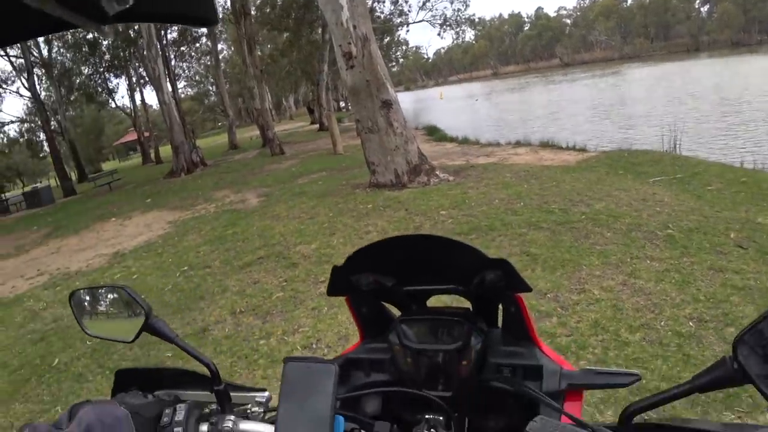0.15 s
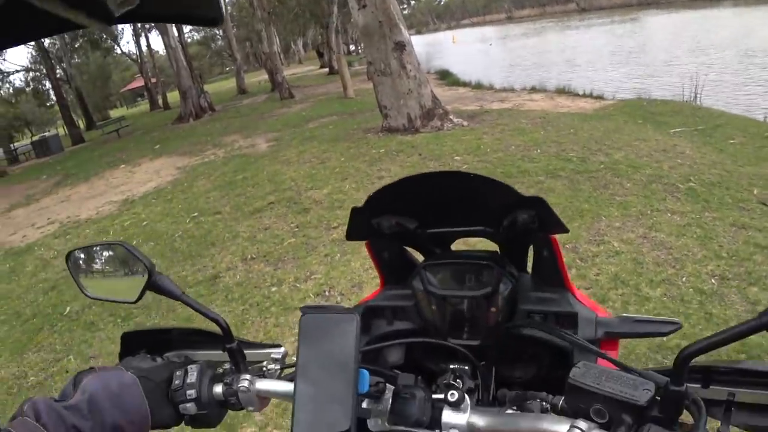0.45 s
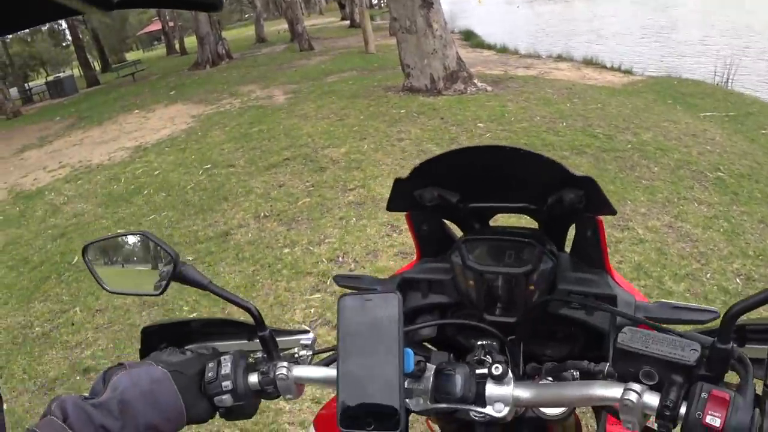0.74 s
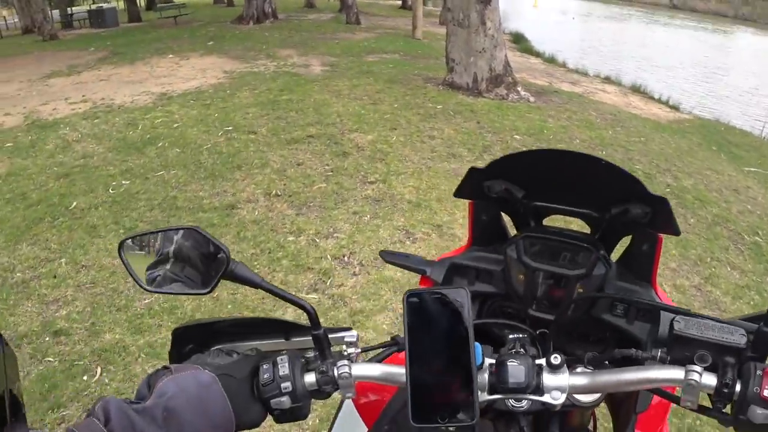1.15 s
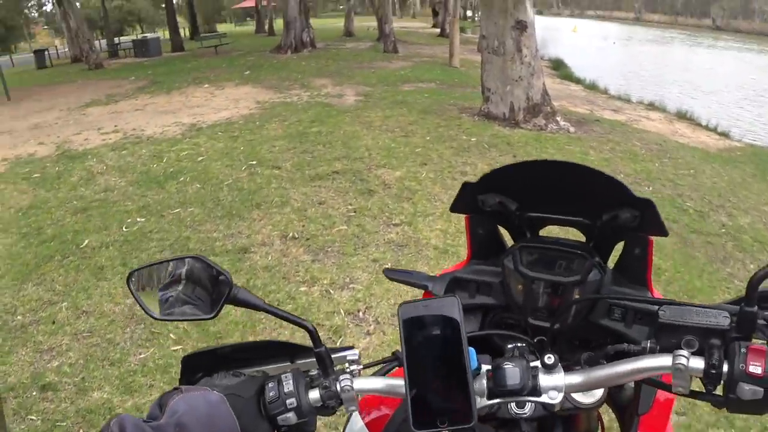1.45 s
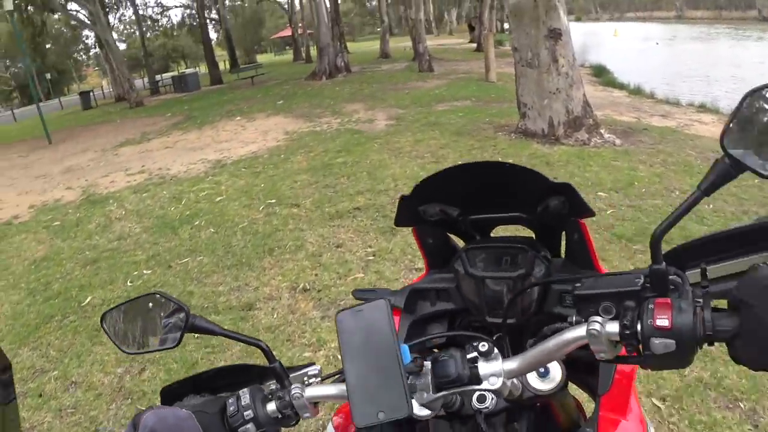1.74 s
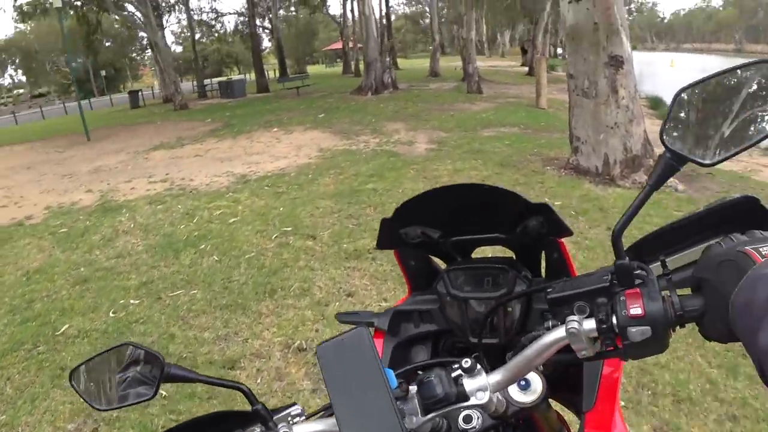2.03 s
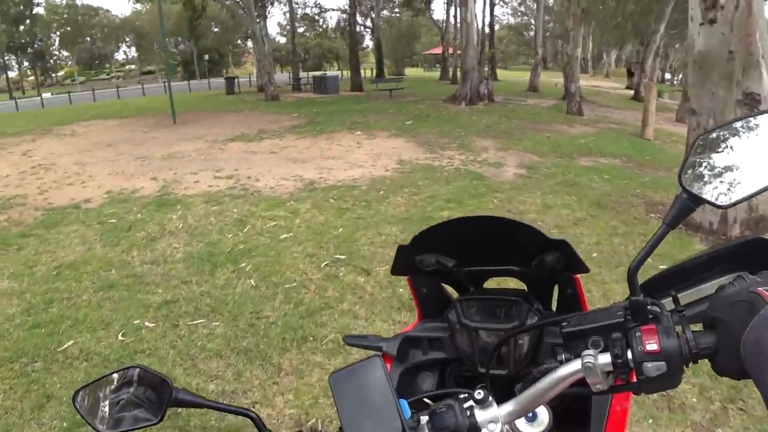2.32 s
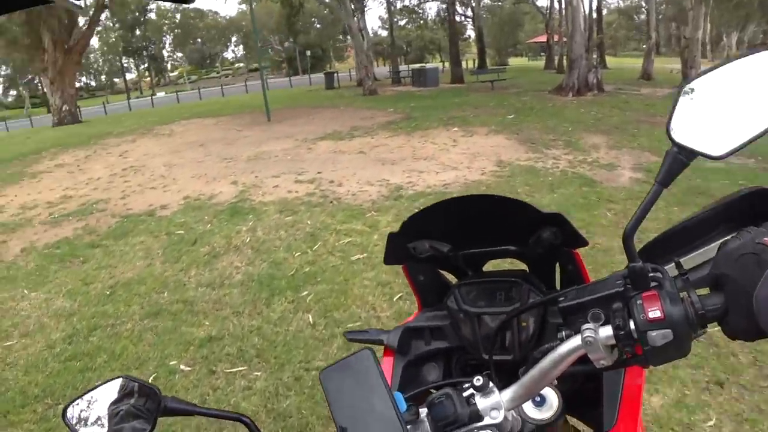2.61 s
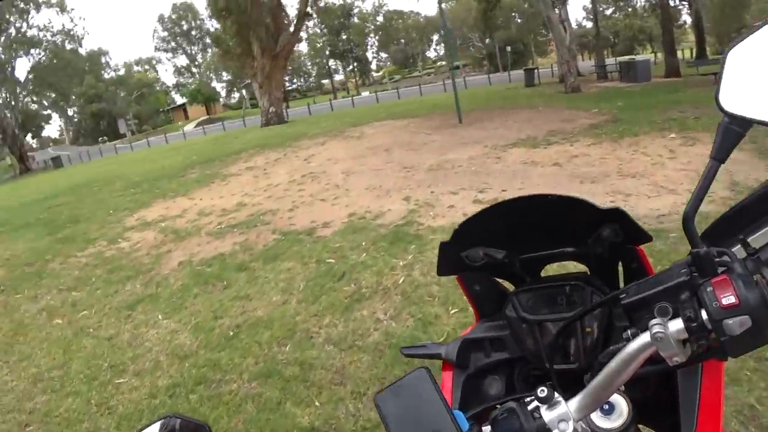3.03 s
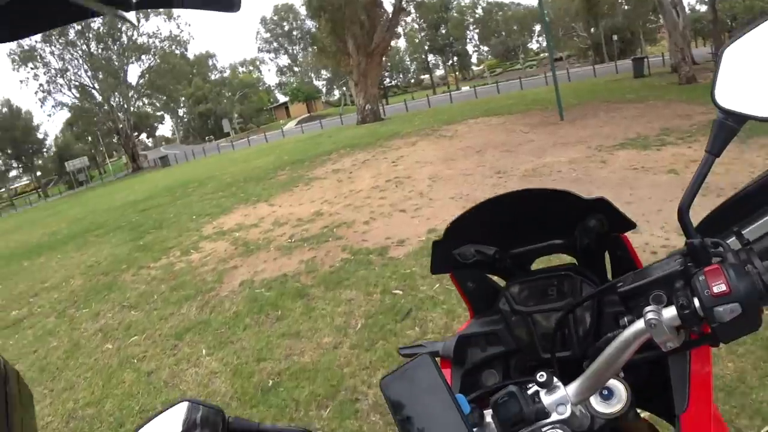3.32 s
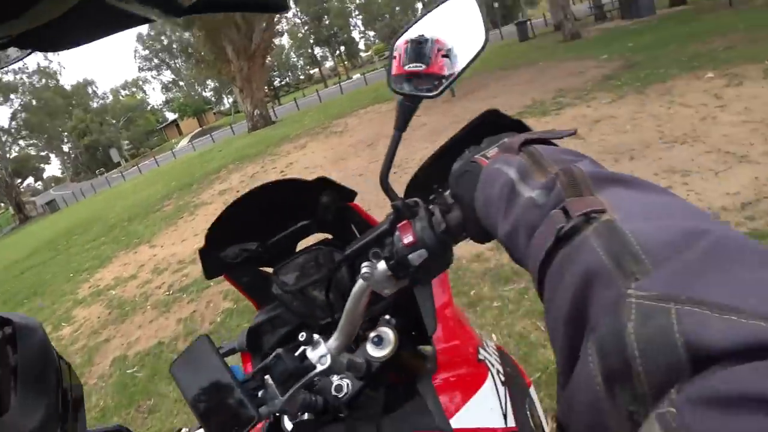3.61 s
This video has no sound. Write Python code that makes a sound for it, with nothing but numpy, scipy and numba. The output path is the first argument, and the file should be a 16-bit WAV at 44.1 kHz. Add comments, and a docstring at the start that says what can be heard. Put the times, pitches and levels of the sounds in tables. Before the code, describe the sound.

A twin-cylinder motorcycle engine idles with lumpy, uneven thumps, dips near 0.55 s with a soft intake gasp, then revs up by 1 s and holds until 1.8 s. It falls to 2.15 s, blips highest at 2.4 s, sags by 2.8 s, and recovers to steady moderate revs. Valve ticks, casing whirr and wobbling gear whine follow; small metal chinks near 2.9 s; low air rumble, close and dry.

```python
"""A parallel-twin motorcycle engine idles, then revs up and down in uneven swells.
Two unevenly spaced firings a cycle ring the pipes as decaying pressure steps; gas rasps and silencer tones join.
Filtered noise makes the valve ticks, casing whirr and intake; a wobbling tone makes the gear whine.
A small metal part jingles briefly over low air rumble; a limiter ducks everything after each thump."""
import sys
import numpy as np
from scipy import signal
from scipy.fft import rfft, irfft
from scipy.io import wavfile
from scipy.ndimage import uniform_filter1d, minimum_filter1d, map_coordinates
from numba import njit

SR = 44100
rng = np.random.default_rng(int(sys.argv[2]) if len(sys.argv) > 2 else 0)


def unload_wav(signal):
    """Save mono or channel-first audio to the path in sys.argv[1] as 16-bit WAV at rate SR, clipped to [-1, 1]."""
    wavfile.write(
        sys.argv[1],
        SR,
        np.round(np.clip(np.atleast_2d(signal).T, -1, 1) * 32767).astype(np.int16),
    )


N = 165375

# A cycle is one four-stroke cycle; a turn is crank position in cycles.
# Engine speed. Each row: time in seconds, rate in cycles per second.
SPEED = [(0.0, 9.49), (0.35, 9.78), (0.55, 7.96), (0.65, 9.18), (0.8, 13.65), (0.97, 16.87), (1.15, 17.38),
         (1.5, 17.77), (1.8, 17.71), (1.9, 16.44), (2.05, 12.72), (2.15, 11.34), (2.3, 16.48),
         (2.41, 20.39), (2.55, 16.54), (2.7, 11.83), (2.81, 9.19), (2.9, 11.97), (3.05, 14.23),
         (3.2, 15.12), (3.5, 15.09), (3.75, 14.82)]
START_TURN, IDLE_CYCLES_PER_S, CRUISE_CYCLES_PER_S = -.43, 9.5, 15.16
# Engine effort. Each row: time in seconds, then levels in dB of firing, bark, growl, mechanical noise
# and off-throttle boom.
EFFORT = [(0, 6.5, 1.5, -5, 3.5, -5), (.45, 2, -0.5, 4.5, 0.5, -10), (.58, 2, -1.5, -9, 0, -10),
          (.78, 11.5, 0.5, -4, 7.5, -25), (1.05, 8.5, -0.5, 4, 3.5, -19), (1.4, 6.5, 0, 4.5, 2.5, -12),
          (1.8, 5, 0.5, 5, -0.5, -9), (2.0, -4, 0, -8, -1, 2.5), (2.11, 0, 1.5, -8, 0, -1.5),
          (2.27, 3.5, 0, 7, -1, -19), (2.42, 8, 2, -14, 3.5, -6), (2.5, -6, 5.5, -8, -2.5, 3.5),
          (2.6, -3, 2, 6.5, -3, -3), (2.68, -3, 3, 4, -2, -2), (2.8, -6.5, 0.5, 12.5, -2.5, -1.5),
          (2.95, 3.5, 2, -10, 1.5, -6.5), (3.15, 2.5, 1, -11, 1.5, -5), (3.75, 0.5, 0.5, -20, 1, -19)]

# The two firings. Each row: crank position in cycles, level in dB, relaxation at cruise in seconds.
FIRINGS = [(0, 0, .00195), (.371, 2.4, .00096)]
PULSE_DB, FIRING_SCATTER_DB, DIRECT_DB = 3, 2.37, -13.5
EDGE_S, SWELL_S, SWELL_SHARE = .0019, .0017, .36
STRETCH_POWER = 1.82  # a slower crank draws each pulse out
SURGE_DB, SURGE_TURN, SURGE_WIDTH_CYCLES = -22.5, .70, .12
# Low resonances of pipe and airbox. Each row: centre in Hz, width in Hz, level in dB.
PIPE_MODES = [(60.76, 1.7, 8), (75.1, 13.7, 5.5), (95.3, 23.5, 6), (116.2, 16.3, 4.5), (129.9, 12, 4.1)]
# Upper resonances, the bark. Each row: centre in Hz, width in Hz, level in dB.
BARK_MODES = [(216.7, 6.5, 2.5), (240.6, 38, 4.5), (291.4, 30, -3.1), (320.7, 8.8, -8)]
# Highest resonances, the growl. Each row: centre in Hz, width in Hz, level in dB.
GROWL_MODES = [(372.5, 11, 1), (419, 6.5, 5), (475.4, 4.4, 4.5)]
PUFF_DB, PUFF_DECAY_S = -39, .0062
# Clean silencer tones. Each row: multiple of the cycle rate, level in dB.
SILENCER_TONES = [(18, -43), (19, -43), (22, -51), (24, -45.5), (27, -48)]

# Spectrum of the engine's mechanical noise. Each row: frequency in Hz, relative density in dB per Hz.
CASING_SPECTRUM = [(290, 7.5), (450, 2), (540, -3), (764, -8), (847, -16), (1050, -5), (1360, -4.5),
                   (1670, -8.5), (2110, -15.5), (2910, -18.5), (3350, -26.5), (3620, -29.5), (4450, -24),
                   (5750, -28), (7160, -34.5), (10100, -40), (10800, -49.5), (14000, -94), (22000, -120)]
WHIRR_DB, TICK_DB, TICK_DECAY_S, TICK_SCATTER_DB = -34, -35, .0021, 6
CASING_RING_S, CASING_RING_DB = .01, -2
SING_HZ, SING_WIDTH_HZ, SING_DB = 5986, 193, 10

# Hiss and hum levels are relative to the air rasp.
GULP_DB, GULP_FADE_DB_PER_RATE = -37.5, -2.91  # fade per cycle/s over idle
RASP_HZ, RASP_BAND_HZ, RASP_TURN, RASP_WIDTH_CYCLES = 1300, 1230, .92, .031
HISS_DB, HISS_TURN, HISS_WIDTH_CYCLES = -15.5, .91, .037
HUM_HZ, HUM_DB, HUM_TURN, HUM_WIDTH_CYCLES = 216.9, 14, .65, .23

# Gear whine, sliding against the engine as the clutch slips. Each row: time in seconds, pitch in Hz, level in dB.
WHINE = [(0, 897.3, -3), (0.62, 946, -13), (0.721, 1104, 6.5), (0.818, 1250, 5), (1.001, 1570, -1),
         (1.201, 1641, -3), (1.78, 1688, -4), (1.9, 1467, -2.5), (1.999, 1230, -1.5), (2.117, 1101, 5),
         (2.201, 1140, -7.5), (2.321, 1650, -6), (2.431, 1897, -5), (2.55, 1397, -10), (2.652, 1140, 0.5),
         (2.702, 1090, 1.5), (2.758, 950, -1), (2.82, 930, -3.5), (2.881, 1145, -4.5), (3.003, 1130, 1.5),
         (3.103, 1295, -0.5), (3.4, 1370, -3), (3.75, 1420, 2)]
# Load peaks on the gear teeth. Each row: crank position in cycles, level in dB over the steady whine.
TOOTH_LOADS = [(.23, 4), (.55, 0), (.74, 4), (.92, 5)]
# Resonances of the clutch cover. Each row: centre in Hz, width in Hz, level in dB.
COVER_MODES = [(1126, 103, 4), (1700, 160, -5), (1900, 180, -1)]
WHINE_DB, OVERTONE_DB, LOAD_WIDTH_S = -40.5, -11, .0021
WHINE_SWING_HZ, WHINE_ROUGHNESS = 28, .4
CRUISE_JITTER_HZ, JITTER_POWER = 35, 1.5  # jitter grows as this power of engine speed

# Resonances of the opened intake, passed twice. Each row: centre in Hz, width in Hz, level in dB a pass.
INTAKE_MODES = [(423, 46, 1), (525, 100, -2.5), (1140, 230, -3.5)]
GASP_AT_S, GASP_WIDTH_S, GASP_DB = .567, .012, -28

# Metal chinks. Each row: start in seconds, shiver level in dB, attack in seconds, decay in seconds, knock level in dB.
CHINKS = [(2.843, -40.5, 0.00035, 0.0026, -34), (2.878, -40, 0.00056, 0.003, -34.5),
          (2.913, -50, 0.0041, 0.018, -51), (2.932, -37, 0.013, 0.041, -43)]
# Rings of the metal part. Each row: centre in Hz, first-pass width in Hz, level in dB.
METAL_MODES = [(5860, 310, -6), (7990, 490, -1.5), (8930, 180, -9), (9100, 580, -1), (10330, 270, -1)]
RING_DB, RING_DECAY_S = -7.5, .034

BOOM_DB, BOOM_HZ, BOOM_WIDTH_HZ, BOOM_WANDER = -16.5, 53, 16.6, .74
AIR_DB, BODY_DB = -29, -36
CEILING, RELEASE_S, LOOK_SPAN_S, TOP_HZ = .52, .039, .00061, 10800


def undb(db):
    """Amplitude ratio of a level in dB."""
    return 10 ** (np.asarray(db) / 20)


def unit(x):
    """Scale to an RMS of 1."""
    return x / np.sqrt(np.mean(x ** 2))


def noise():
    """White noise of the scene's length."""
    return rng.standard_normal(N)


def band(x, hz, width_hz):
    """Resonance with gain 1 at its centre."""
    b, a = signal.iirpeak(min(hz, .45 * SR), hz / width_hz, fs=SR)
    return signal.lfilter(b, a, x)


def ring(x, modes):
    """Sum of parallel resonances, each (Hz, width Hz, dB)."""
    return sum(undb(db) * band(x, hz, width_hz) for hz, width_hz, db in modes)


def colour(x, points):
    """Shape a spectrum by (Hz, dB) points, falling steeply below the first."""
    hz, db = np.array(points).T
    f = np.maximum(np.fft.rfftfreq(N, 1 / SR), 1)
    low_cut = np.minimum(f / hz[0], 1) ** 2
    gain = undb(np.interp(np.log(f), np.log(hz), db)) * low_cut
    return irfft(rfft(x) * unit(gain), N)


def walk(points_per_s):
    """Smooth random wander with RMS 1."""
    points = rng.standard_normal(8192)
    position = np.arange(N) / SR * points_per_s
    return unit(map_coordinates(points, [position], order=3, mode="wrap"))


def since(turn, offset):
    """Signed seconds from the nearest passing of a crank position, and that passing's index."""
    t = np.arange(N) / SR
    number = np.round(turn - offset)
    passing_s = np.interp(number + offset, turn, t, left=-1, right=t[-1] + 1)
    return t - passing_s, number.astype(int) + 2


def exhaust(turn, rate, bark_db, growl_db):
    """Each firing, a swell and a sharp pressure drop, rings the pipes; a soft low surge follows the second firing."""
    push = 0
    stretch = (CRUISE_CYCLES_PER_S / rate) ** STRETCH_POWER
    for offset, db, relax_s in FIRINGS:
        age_s, number = since(turn, offset)
        swell = SWELL_SHARE * np.exp(-abs(age_s) / SWELL_S)
        relaxation = np.exp(-abs(age_s) / (relax_s * stretch))
        shape = np.where(age_s < 0, swell, relaxation)
        level_db = db + FIRING_SCATTER_DB * rng.standard_normal(128)[number]
        push = push - np.tanh(age_s / EDGE_S) * shape * undb(level_db)
    surge_age = since(turn, SURGE_TURN)[0] * rate / SURGE_WIDTH_CYCLES
    surge = undb(SURGE_DB) * (1 - 2 * surge_age ** 2) * np.exp(-surge_age ** 2)
    bark = undb(bark_db) * ring(push, BARK_MODES)
    growl = undb(growl_db) * ring(push, GROWL_MODES)
    return undb(DIRECT_DB) * push + ring(push, PIPE_MODES) + bark + growl + surge


def puffs(turn):
    """Gas rasps at each firing: band noise that swells and fades about it."""
    gate = sum(np.exp(-abs(since(turn, offset)[0]) / PUFF_DECAY_S) for offset, _, _ in FIRINGS)
    rasp = unit(band(band(noise(), 640, 470), 700, 670))
    return undb(PUFF_DB) * gate * rasp


def drone(turn, growl_db):
    """The silencer holds tones locked to the crank, their level following the growl."""
    tones = sum(undb(db) * np.sin(2 * np.pi * k * turn) for k, db in SILENCER_TONES)
    return undb(growl_db) * tones


def mechanics(turn, ticks_per_cycle=8):
    """Valve ticks and the whirr of chain and bearings ring the many close modes of the engine casing."""
    ticks = 0
    for k in range(ticks_per_cycle):
        age_s, number = since(turn, k / ticks_per_cycle)
        level = undb(TICK_SCATTER_DB * rng.standard_normal(128)[number])
        ticks = ticks + (age_s > 0) * np.exp(-abs(age_s) / TICK_DECAY_S) * level
    drive = noise() * undb(WHIRR_DB) + noise() * ticks * undb(TICK_DB)
    # decaying noise stands for the dense modes
    modes = band(noise(), 6170, 4600) * np.exp(-np.arange(N) / SR / CASING_RING_S)
    rung = signal.fftconvolve(drive, modes / np.linalg.norm(modes))[:N]
    singing = undb(SING_DB) * band(drive, SING_HZ, SING_WIDTH_HZ)
    return colour(drive + undb(CASING_RING_DB) * rung + singing, CASING_SPECTRUM)


def gulps(turn, rate):
    """The intake hums, rasps and hisses once a cycle, fading as the engine speeds up."""
    def gate(offset, width_cycles):
        """Gaussian opening about a crank position, of random level each cycle."""
        age_s, number = since(turn, offset)
        return np.exp(-.5 * (age_s * rate / width_cycles) ** 2) * undb(rng.standard_normal(128)[number])

    rasp = unit(band(band(noise(), RASP_HZ, RASP_BAND_HZ), RASP_HZ, 2 * RASP_BAND_HZ))
    rasp = rasp * gate(RASP_TURN, RASP_WIDTH_CYCLES)
    hiss = undb(HISS_DB) * unit(band(noise(), 6100, 5000)) * gate(HISS_TURN, HISS_WIDTH_CYCLES)
    tone = np.sin(2 * np.pi * HUM_HZ * np.arange(N) / SR)
    hum = undb(HUM_DB) * tone * gate(HUM_TURN, HUM_WIDTH_CYCLES)
    level_db = GULP_DB + GULP_FADE_DB_PER_RATE * (rate - IDLE_CYCLES_PER_S)
    return (rasp + hiss + hum) * undb(level_db)


def gears(t, turn, rate):
    """Tooth whine wobbles with the crank, throbs with each tooth load and swells on the cover resonances."""
    when_s, pitch_hz, db = np.array(WHINE).T
    strain = (rate / CRUISE_CYCLES_PER_S) ** JITTER_POWER
    swing_hz = WHINE_SWING_HZ * np.sin(2 * np.pi * (turn - .25))
    jitter_hz = CRUISE_JITTER_HZ * strain * walk(260)
    hz = np.interp(t, when_s, pitch_hz) + swing_hz + jitter_hz
    loads = 0
    for offset, load_db in TOOTH_LOADS:
        age_s, _ = since(turn, offset)
        loads = loads + undb(load_db) * np.exp(-.5 * (age_s / LOAD_WIDTH_S) ** 2)
    throb = (1 + loads) * (1 + WHINE_ROUGHNESS * walk(220))
    phase = 2 * np.pi * np.cumsum(hz) / SR
    tone = unit(throb * (np.sin(phase) + undb(OVERTONE_DB) * np.sin(2 * phase)))
    return undb(WHINE_DB + np.interp(t, when_s, db)) * (tone + ring(tone, COVER_MODES))


def throttle(t):
    """One soft, hollow rush of air in the airbox as the throttle opens."""
    air = ring(ring(noise(), INTAKE_MODES), INTAKE_MODES)
    return undb(GASP_DB) * unit(air) * np.exp(-.5 * ((t - GASP_AT_S) / GASP_WIDTH_S) ** 2)


def jingle(t):
    """A small loose metal part knocks and shivers: noise bursts through broad and high, ringing bands."""
    shiver, knock = 0, 0
    for start_s, db, attack_s, decay_s, knock_db in CHINKS:
        rise = np.exp(np.minimum(t - start_s, 0) / attack_s)
        age_s = np.maximum(t - start_s, 0)
        decay = np.exp(-age_s / decay_s)
        shiver = shiver + undb(db) * rise * (decay + undb(RING_DB) * np.exp(-age_s / RING_DECAY_S))
        knock = knock + undb(knock_db) * rise * decay
    metal = 0
    for hz, width_hz, db in METAL_MODES:
        metal = metal + undb(db) * band(band(noise(), hz, width_hz), hz, 2 * width_hz)
    return shiver * unit(metal) + knock * unit(band(noise(), 3100, 5500))


def rumble(turn, boom_db):
    """Off the throttle the pumping pistons boom unevenly in the airbox; air buffets and the bodywork drones."""
    pumping = sum((1 + BOOM_WANDER * walk(3.2)) * np.sin(2 * np.pi * k * turn) for k in range(3, 8))
    boom = undb(BOOM_DB) * unit(band(pumping, BOOM_HZ, BOOM_WIDTH_HZ))
    air = undb(AIR_DB) * unit(band(band(noise(), 55, 57), 59, 74))
    body = undb(BODY_DB) * unit(band(band(noise(), 210, 100), 180, 190))
    return undb(boom_db) * boom + air + body


def scene():
    """Drive every source from the shared engine speed, crank position and effort."""
    t = np.arange(N) / SR
    rate = np.interp(t, *np.array(SPEED).T)
    turn = START_TURN + np.cumsum(rate) / SR
    when_s, *columns = np.array(EFFORT).T
    firing_db, bark_db, growl_db, machine_db, boom_db = (np.interp(t, when_s, c) for c in columns)
    pulses = undb(PULSE_DB) * exhaust(turn, rate, bark_db, growl_db)
    firing = undb(firing_db) * (pulses + puffs(turn)) + drone(turn, growl_db)
    machine = undb(machine_db) * (mechanics(turn) + gulps(turn, rate)) + gears(t, turn, rate)
    return (firing + machine + throttle(t) + jingle(t) + rumble(turn, boom_db))[None]


@njit
def peak_hold(x, fall):
    """Follow peaks at once and let go slowly."""
    out, level = np.empty(len(x)), 0.
    for i in range(len(x)):
        level = max(x[i], level * fall)
        out[i] = level
    return out


def record(dry):
    """A look-ahead limiter holds the thumps near the ceiling; DC and the top are cut."""
    held = peak_hold(abs(dry[0]), np.exp(-1 / (RELEASE_S * SR)))
    span = int(LOOK_SPAN_S * SR) + 1
    gain = minimum_filter1d(CEILING / np.maximum(held, CEILING), span)
    limited = dry * uniform_filter1d(gain, span)
    low_cut = signal.butter(1, 3, "high", fs=SR, output="sos")
    top_cut = signal.ellip(10, .2, 70, TOP_HZ, fs=SR, output="sos")
    return signal.sosfilt(top_cut, signal.sosfilt(low_cut, limited))


dry = scene()
out = record(dry)
unload_wav(out)
```